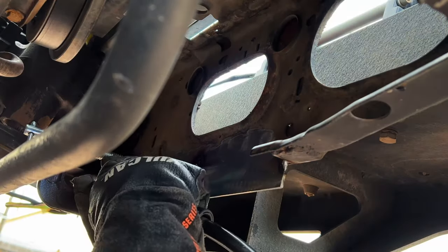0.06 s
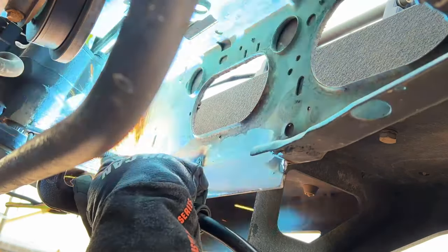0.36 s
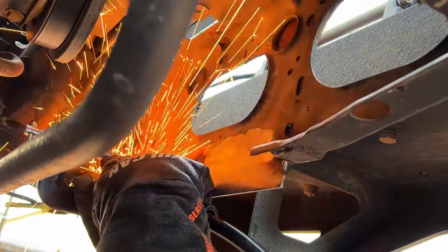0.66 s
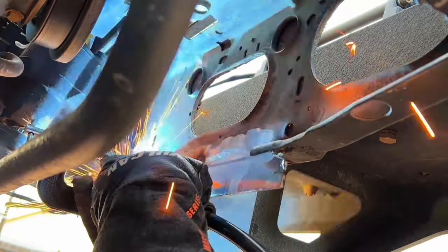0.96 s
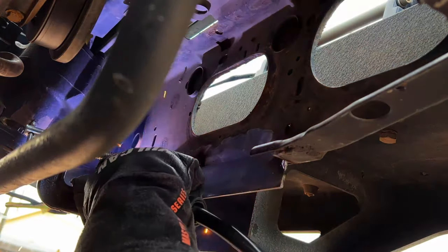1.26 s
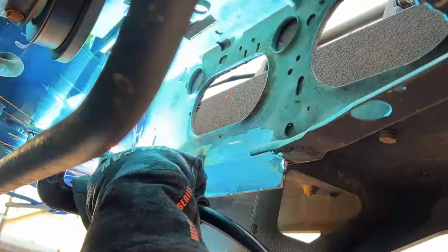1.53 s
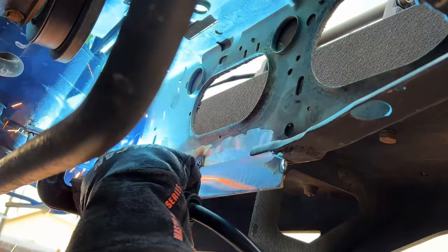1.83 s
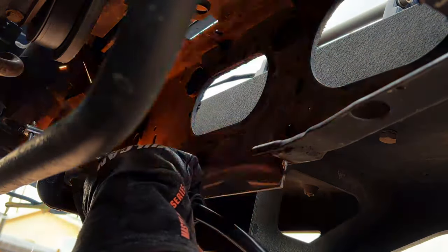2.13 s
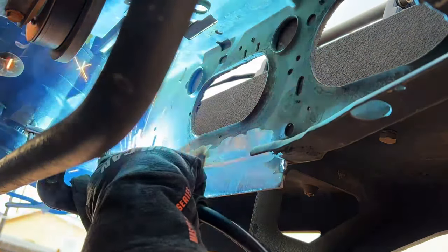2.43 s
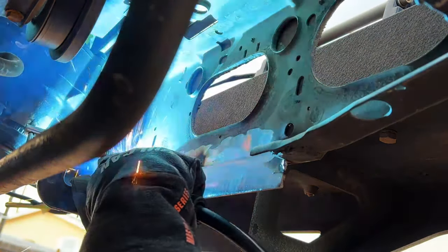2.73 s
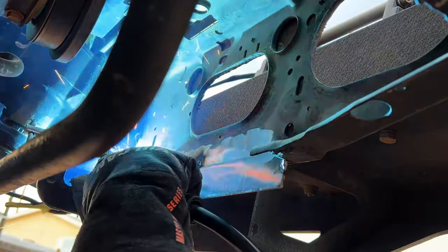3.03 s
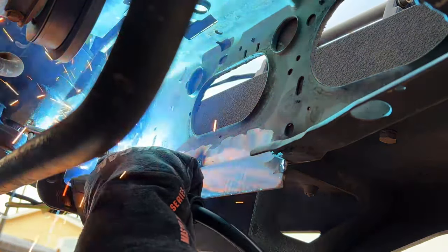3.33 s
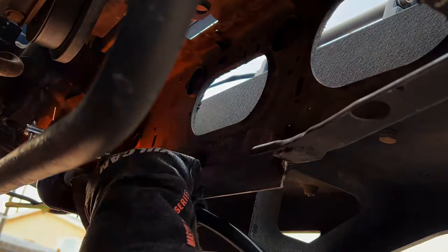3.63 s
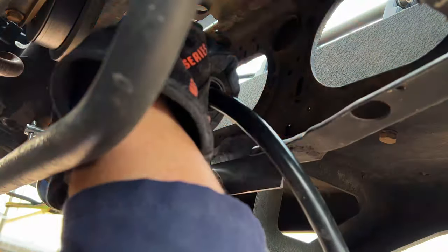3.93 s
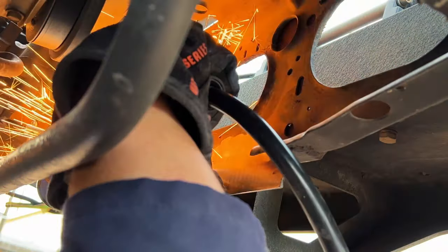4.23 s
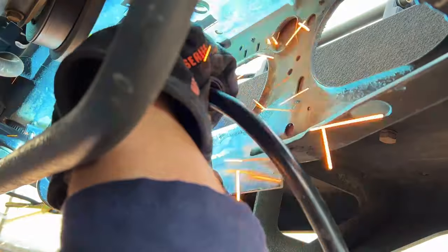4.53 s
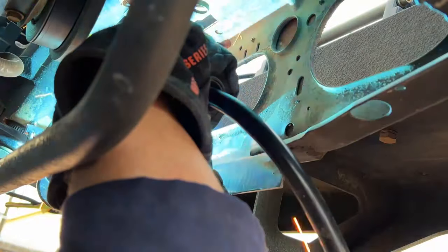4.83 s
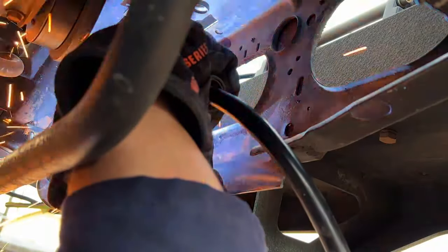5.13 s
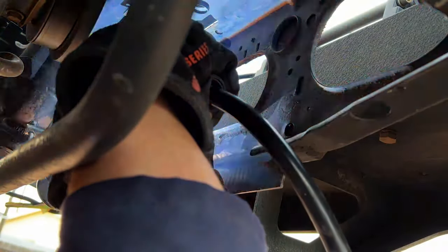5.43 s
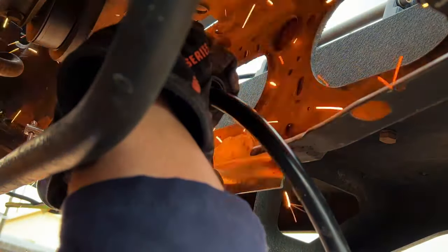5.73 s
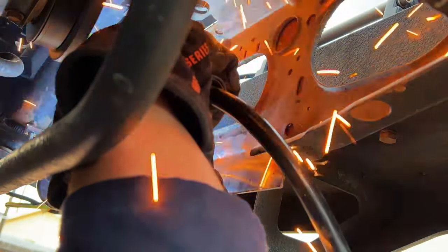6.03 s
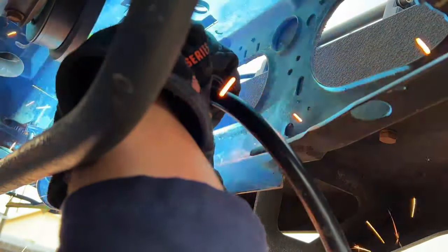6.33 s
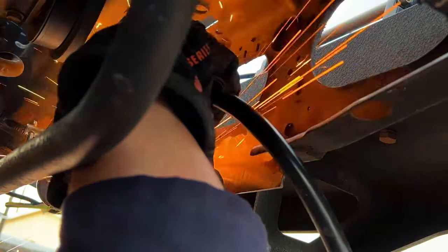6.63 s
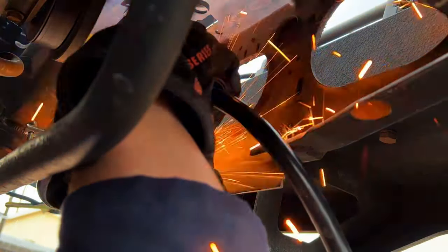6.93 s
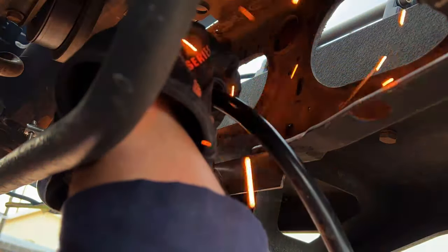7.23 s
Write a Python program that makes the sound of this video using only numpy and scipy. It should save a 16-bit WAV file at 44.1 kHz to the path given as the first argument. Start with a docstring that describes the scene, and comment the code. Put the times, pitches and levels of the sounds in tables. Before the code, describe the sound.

A wire-feed welder pops, crackles and sizzles close up in uneven bursts on steel, over faint gas hiss and fan hum.

```python
"""Wire-feed tack welding on the steel underside of a vehicle, heard close up, at two spots in turn.
The wire shorts on the pool and blows free with a sharp pop, singly or in a fast rattle, and the lit arc
sizzles. The hollow of the steelwork colours both, and longer stubs of wire go with a low puff.
Behind it, shielding gas surges and hisses, the welder's fan hums and a few faint squeaks pass.
A fast limiter flattens the pops."""
import sys
import numpy as np
from scipy import signal
from scipy.fft import rfft, irfft
from scipy.io import wavfile
from scipy.ndimage import uniform_filter1d, minimum_filter1d

SR = 44100
rng = np.random.default_rng(int(sys.argv[2]) if len(sys.argv) > 2 else 0)


def to_wav(s):
    """Save 16-bit WAV."""
    ch = np.atleast_2d(s).T  # columns
    pcm = np.round(np.clip(ch, -1, 1) * 32767)  # PCM
    wavfile.write(sys.argv[1], SR, pcm.astype(np.int16))


N = 325017

# Pops that stand out as the wire blows free: start_s, relative_level_db, low_shelf_db
WIRE_POPS = [(.319, -37.5, 19.5), (0.3427, -15, -7), (0.3524, -14, -4), (.3738, -15, -5.5),
             (0.4084, -15.5, -6), (0.4348, -16, -4), (0.546, -30.5, -9), (.5763, -17.5, -2.5),
             (.5916, -34, 6), (.609, -24, -6), (0.6138, -17, -20), (0.6222, -24.5, 12), (.6631, -33, -3),
             (.6708, -34, 14.5), (0.8065, -58, 24.5), (.9329, -23, -3), (0.9426, -18, -12),
             (.9867, -20, -0.5), (1.013, -28, -1), (1.0395, -17, -7), (1.3894, -20, -2),
             (1.4557, -17, -6.5), (1.5023, -23.5, -3), (1.5113, -15.5, -8), (1.5384, -20.5, -5.5),
             (1.554, -24, -7), (1.596, -20.5, -4), (1.688, -22, -10), (1.9751, -58.5, 24.5),
             (2.1571, -31, -2), (2.1616, -13.5, -9), (2.3368, -19.5, 1.5), (2.3569, -14, -6.5),
             (2.4023, -19, -5), (2.4408, -24.5, -2), (2.4852, -21.5, 0), (2.5326, -23.5, 1),
             (2.5723, -25.5, 0), (2.6816, -27.5, 4.5), (2.7143, -21, -5), (2.7418, -17.5, -12),
             (2.754, -19.5, -5), (2.773, -20, 2), (2.8117, -19, 0.5), (2.825, -13, -8), (2.8373, -20.5, 1),
             (2.906, -20, -1), (2.965, -20.5, 2), (3.0033, -25, 3.5), (3.0384, -21.5, -1),
             (3.0618, -17, -3.5), (3.078, -19, -7), (3.094, -19, -13), (3.115, -24, -5),
             (3.1318, -16.5, -12), (3.1489, -21.5, -3), (3.1875, -20.5, -5.5), (3.205, -19, -10),
             (3.2797, -19, -2.5), (3.317, -22.5, -3), (4.153, -39.5, 13.5), (4.1766, -17, -8),
             (4.194, -17.5, -4), (4.2064, -21.5, 0), (4.2576, -19.5, -14), (4.2822, -24, -18),
             (4.3034, -18, 2.5), (4.3463, -52, 21), (4.4101, -20.5, -7), (4.472, -10.5, -4),
             (4.539, -24, 6.5), (4.611, -28.5, 1.5), (4.627, -20, 2.5), (4.6635, -15, -4),
             (4.694, -13, 1.5), (4.7131, -11, -1.5), (4.7448, -18.5, 4), (4.8035, -16, -0.5),
             (4.949, -25, -16), (4.9676, -26, 13), (4.9797, -19.5, 1), (4.9988, -19, 6.5),
             (5.0124, -20, -3), (5.0323, -24.5, 13), (5.0403, -28, 11), (5.4523, -22.5, 9.5),
             (5.5117, -24.5, 6), (5.52, -18.5, 13), (5.5581, -18, 0), (5.5737, -13, -13),
             (5.611, -12.5, -7), (5.6368, -16.5, -3.5), (5.6591, -17.5, -1), (5.6985, -53.5, 24),
             (5.815, -33, 7), (5.8368, -20, -4), (5.888, -13, 1), (5.9478, -21, -6), (6.037, -56, 24),
             (6.128, -37.5, -6), (6.1366, -17, 1), (6.1943, -23.5, 2), (6.2229, -21, 0.5),
             (6.2593, -36.5, 19), (6.289, -16, -2.5), (6.321, -20.5, -1.5), (6.3437, -25.5, 6),
             (6.3795, -24, 8.5), (6.4067, -20.5, 3), (6.5187, -15, 0.5), (6.5536, -18, 2.5),
             (6.5751, -17.5, 0), (6.6034, -17, -4.5), (6.6561, -16.5, -1.5), (6.7254, -16.5, 0),
             (6.9219, -17.5, 3.5), (6.9297, -14, -1.5)]


def amp(db):
    """Decibels to gain."""
    return 10 ** (np.asarray(db) / 20)


def unit(x):
    """Scales to an rms of one."""
    return x / np.sqrt(np.mean(x ** 2) + 1e-20)


def eq_curve(points, hz):
    """Joins (freq_hz, level_db) points on a logarithmic frequency axis."""
    freq_hz, level_db = np.transpose(points)
    return np.interp(np.log(hz + 1), np.log(freq_hz + 1), level_db)


def drift(rate_hz):
    """Smooth random movement of rms one, up to about the given rate."""
    hz = np.fft.rfftfreq(N, 1 / SR)
    return unit(irfft(rfft(rng.standard_normal(N)) * np.exp(-(hz / rate_hz) ** 2), N))


def noise(colour):
    """Noise of rms one with the given EQ curve."""
    hz = np.fft.rfftfreq(N, 1 / SR)
    return unit(irfft(rfft(rng.standard_normal(N)) * amp(eq_curve(colour, hz)), N))


def lowpass(x, corner_hz):
    """Gentle one-pole low-pass."""
    pole = np.exp(-2 * np.pi * corner_hz / SR)
    return signal.lfilter([1 - pole], [1, -pole], x)


def envelope(start, end, rise_s, decay_s):
    """Rises from the start, holds until the end, then dies away."""
    t = np.arange(N) / SR
    return np.clip((t - start) / rise_s, 0, 1) * np.exp(-np.maximum(t - end, 0) / decay_s)


def shielding_gas(steelwork, flow_db=-58.5, ring_mix=1.7, nozzle_mix=0.44):
    """Gas surges, then settles to a steady hiss, ringing in the nozzle and off the steelwork."""
    # Tone of the gas jet: freq_hz, level_db
    jet_colour = [(300, -50), (1500, -6), (3800, -11), (5000, -8), (6200, -1.5), (7200, -1.5), (8700, -5.5),
                  (9700, -1.5), (11000, -14), (14000, -9), (16000, -20)]
    # Resonances of the nozzle: pitch_hz, half_width_hz, level_db
    nozzle_modes = [(5120, 78, 4), (6100, 200, -1), (6000, 90, -9), (6600, 35, -15), (6970, 170, 1),
                    (7850, 160, -6), (8670, 120, -23), (9470, 73, 0.5)]
    # Surges as the trigger opens the valve: start_s, rise_s, peak_db, decay_s
    surges = [(0, 0.074, -50, 0.73), (3.913, .005, -52.5, 0.18)]
    jet, hz = noise(jet_colour), np.fft.rfftfreq(N, 1 / SR)
    hiss = unit(jet + ring_mix * signal.fftconvolve(jet, steelwork)[:N])
    nozzle = sum(amp(db) / (1 + ((hz - centre) / width) ** 2) for centre, width, db in nozzle_modes)
    whistle = unit(irfft(rfft(rng.standard_normal(N)) * nozzle, N))
    surge = sum(amp(db) * envelope(s, s + rise_s, rise_s, decay_s) for s, rise_s, db, decay_s in surges)
    return np.hypot(amp(flow_db), surge) * unit(hiss + nozzle_mix * whistle) * amp(.5 * drift(25))


def welder_hum(room_db=-65.5, pitch_waver=0.0011, waver_db=2.3):
    """The fan and transformer hum, wavering slightly, over the room tone of the workshop."""
    # Fan and transformer tones: pitch_hz, level_db
    tones = [(61.5, -74), (333.8, -76.5), (629.8, -81), (775.2, -70.5), (882.9, -76), (1330, -81.5),
             (1550, -90)]
    # Room tone of the workshop: freq_hz, relative_level_db
    room_colour = [(12, -32), (20, -2), (70, -12), (153, -16), (335, -11), (474, -19), (752, -9.5),
                   (825, -12.5), (884, -11.5), (1170, -14.5), (1310, -10.5), (3880, -22), (5000, -27.5),
                   (6500, -44), (11000, -120)]
    phase_per_hz = 2 * np.pi * np.cumsum(1 + pitch_waver * drift(6.0)) / SR
    hum = sum(amp(db + waver_db * drift(6.2)) * np.sin(hz * phase_per_hz) for hz, db in tones)
    return np.sqrt(2) * hum + amp(room_db) * noise(room_colour)


def squeaks():
    """Faint, fuzzy whistles swell, glide and fade."""
    # Narrow bands of gliding noise: start_s, length_s, start_hz, end_hz, width_hz, level_db
    glides = [(0, 0.29, 1790, 1840, 150, -60), (.42, 0.19, 1810, 1800, 110, -64),
              (1.153, 0.045, 3050, 2900, 300, -62), (1.196, 0.048, 2760, 2700, 240, -54),
              (1.242, 0.058, 3130, 3260, 240, -55)]
    out = np.zeros(N)
    for s, length_s, start_hz, end_hz, width_hz, db in glides:
        size = int(length_s * SR)
        carrier = np.exp(2j * np.pi * np.cumsum(np.linspace(start_hz, end_hz, size)) / SR)
        white = rng.standard_normal(SR) + 1j * rng.standard_normal(SR)
        fuzz = lowpass(lowpass(white, width_hz / 2), width_hz / 2)[-size:]
        swell = signal.windows.tukey(size, .5)
        out[round(s * SR):][:size] += amp(db) * unit((carrier * fuzz).real) * swell
    return out


def pops(shorts, gain_db=22.5, spray_mix=0.35, spray_growth=0.34, spray_s=0.0014, shelf_hz=2000):
    """The bursting wire gives a pressure spike and a spray of droplets; harder pops spray more."""
    spikes, body = np.zeros((2, N))
    t = np.arange(SR // 100) / SR
    usual_db = np.median([db for _, db, _ in shorts])
    for s, db, shelf_db in shorts:
        pop = rng.standard_normal(len(t)) ** 3 * np.exp(-t / spray_s)  # cubed noise spits like droplets
        pop *= spray_mix * amp(spray_growth * (db - usual_db)) / np.linalg.norm(pop)
        pop[0] = 1  # the pressure spike
        at = round(s * SR) + np.arange(len(t))
        spikes[at] += amp(db) * pop
        body[at] += amp(db) * (amp(shelf_db) - 1) * pop
    return amp(gain_db) * (spikes + lowpass(body, shelf_hz))


def rattle_dips(jitter_s=0.001, shelf_db=0.5):
    """The wire dips into the pool at a steady pace between the main pops; gives rows like WIRE_POPS."""
    # Runs of quick dips: start_s, end_s, dips_per_s, relative_level_db
    rattles = [(.33, .45, 70, -21.5), (1.0, 1.06, 75, -24), (1.545, 1.61, 48, -25.5), (1.58, 1.70, 87, -26),
               (2.35, 2.42, 45, -21), (2.43, 2.50, 45, -27.5), (2.67, 2.82, 60, -24.5),
               (2.83, 3.045, 50, -23.5), (3.03, 3.14, 72, -22.5), (3.195, 3.33, 44, -24.5),
               (4.61, 4.68, 55, -20.5), (4.73, 4.82, 52, -17.5), (5.565, 5.62, 80, -22.5),
               (6.25, 6.30, 65, -25.5), (6.565, 6.62, 105, -20), (6.64, 6.74, 43, -20)]
    main_s, dips = np.array(WIRE_POPS)[:, 0], []
    for start, end, rate, db in rattles:
        accents = main_s[(main_s > start) & (main_s < end)]
        for a, b in zip(accents, accents[1:]):
            fill_s = np.linspace(a, b, round((b - a) * rate) + 1)[1:-1]
            dips += [(s + jitter_s * rng.standard_normal(), db, shelf_db) for s in fill_s]
    return dips


def sizzle(shorts, gain_db=-2.0, flutter_db=3.5, wander_db=1.5, duck_s=0.0015, duck_depth=0.85):
    """The lit arc fries in fine grains, and ducks while the wire is shorted just before each pop."""
    # Stretches in which the arc stays lit: start_s, end_s, relative_level_db, lows_over_highs_db
    burns = [(0.332, 0.42, -31.5, 1), (0.605, 0.629, -32, 21), (0.662, 0.735, -49.5, 4),
             (0.944, 0.957, -31, 10), (0.978, 1.062, -51, 20), (1.426, 1.455, -45, -12),
             (1.693, 1.753, -47, -22), (1.48, 1.677, -44.5, 7), (1.775, 1.889, -55, -3),
             (2.228, 2.29, -44, -18), (2.313, 2.684, -45, 0), (2.597, 2.63, -43, -11),
             (2.671, 3.356, -40, -8), (2.999, 3.15, -35.5, -6), (4.15, 4.21, -33.5, 0),
             (4.28, 4.293, -23, -1), (4.521, 4.54, -44, 8), (4.586, 4.79, -41.5, 5),
             (4.962, 5.042, -29.5, 19), (5.038, 5.152, -34.5, 10), (5.212, 5.392, -52.5, 4),
             (5.417, 5.458, -46, 8), (5.527, 5.62, -33.5, 13), (5.81, 6.005, -47.5, 2),
             (6.216, 6.445, -34.5, -17), (6.462, 6.61, -42, -9), (6.66, 6.92, -45.5, -24)]
    grains = unit(rng.standard_normal(N) * amp(flutter_db * drift(250) + wander_db * drift(30)))
    lows = signal.lfilter(*signal.butter(1, 7000, fs=SR), grains)
    t = np.arange(N) / SR
    pop_s = np.r_[np.sort(np.array(shorts)[:, 0]), np.inf]
    until_pop_s = pop_s[np.searchsorted(pop_s, t)] - t
    duck = 1 - duck_depth * np.exp(-(until_pop_s / duck_s) ** 2)
    out = np.zeros(N)
    for start, end, db, lows_db in burns:
        body = amp(lows_db)
        fry = (grains + (body - 1) * lows) / np.sqrt((1 + body ** 2) / 2)
        out += amp(db) * envelope(start, end, rise_s=0.0027, decay_s=0.01) * fry
    return amp(gain_db) * duck * out


def hollow(colour, modes, early_gain, early_s, t60_s, crack_mix=0.85, size=2048):
    """Impulse response of the steelwork: a crack off the nearest faces, then dense, short reflections."""
    hz, t = np.fft.rfftfreq(size, 1 / SR), np.arange(size) / SR
    peaks_db = sum(lift / (1 + (2 * (hz - centre) / width) ** 2) for centre, width, lift in modes)
    tone = amp(eq_curve(colour, hz) + peaks_db)
    decay = np.hypot(amp(-60 * t / t60_s), early_gain * np.exp(-t / early_s))
    log_gain = np.log(np.r_[tone, tone[-2:0:-1]])
    crack = np.fft.ifft(np.exp(signal.hilbert(log_gain).conj())).real  # minimum phase: a tight attack
    response = unit(rng.standard_normal(size) * decay) + crack_mix * unit(crack)
    # Tone and decay are imposed in turn, so the resonances stay as short as the reflections.
    for _ in range(8):
        spectrum = rfft(response) / tone
        spectrum /= np.sqrt(uniform_filter1d(abs(spectrum) ** 2, size=7))
        echoes = irfft(spectrum * tone) / decay
        response = decay * echoes / np.sqrt(uniform_filter1d(echoes ** 2, size=41) + 1e-20)
    return response / np.linalg.norm(response)


def reflections(x, response, steady_s=0.016, low_cut_hz=350, tails=7):
    """Early reflections stay put; late ones shift with the hand and torch, so the pops ring unalike."""
    hz, t = np.fft.rfftfreq(len(response), 1 / SR), np.arange(len(response)) / SR
    steady = np.exp(-(t / steady_s) ** 2)
    low_cut = hz ** 2 / (hz ** 2 + low_cut_hz ** 2)
    tail_tone = np.sqrt(uniform_filter1d(abs(rfft(response)) ** 2, size=61)) * low_cut
    tail_shape = np.sqrt(abs(uniform_filter1d(response ** 2, size=45)) * (1 - steady ** 2))
    out = signal.oaconvolve(x, response * steady)[:N]
    slot = np.arange(N) // (SR // 100) % tails  # round robin: the next tail every 10 ms
    for k in range(tails):
        tail = tail_shape * unit(irfft(tail_tone * np.exp(2j * np.pi * rng.random(len(hz)))))
        out += signal.oaconvolve(x * (slot == k), tail)[:N]
    return out


def workshop_reverb(x, wet_db=-29, t60_s=0.35, damping_hz=6000):
    """The room beyond the vehicle adds a faint, duller tail."""
    t = np.arange(SR // 2) / SR
    tail = lowpass(rng.standard_normal(len(t)), damping_hz) * amp(-60 * t / t60_s)
    return x + amp(wet_db) * signal.fftconvolve(x, tail / np.linalg.norm(tail))[:N]


def puffs():
    """A longer stub of wire blows away with a low push of hot gas that dies within a few cycles."""
    # Puffs of hot gas: start_s, level_db, pitch_hz
    thumps = [(0.344, -37.5, 131), (0.374, -48, 121), (0.411, -47, 110), (0.437, -47, 120),
              (0.623, -30, 236), (2.163, -48, 126), (2.825, -47, 110), (4.194, -31.5, 232),
              (4.471, -51, 131), (4.713, -41, 111), (4.998, -28, 235), (5.04, -39, 230), (5.517, -34, 220),
              (5.886, -45, 130), (6.929, -52, 149)]
    out, t = np.zeros(N), np.arange(SR // 10) / SR
    for s, db, hz in thumps:
        out[round(s * SR):][:len(t)] += amp(db) * np.sin(2 * np.pi * hz * t) * np.exp(-t * hz)
    return out


def scene(move_s=3.7):
    """The arc sounds through the hollow of whichever spot is being welded, over a bed of hiss and hum."""
    # Broad tone of the hollow around each spot: freq_hz, level_db
    first_colour = [(40, -28), (140, -26.5), (195, -12.5), (280, -10), (500, -25.5), (900, -19.5),
                    (2200, -25), (4000, -15.5), (6000, -28.5), (8500, -11), (10500, -12), (13500, -25),
                    (15700, -11.5)]
    second_colour = [(40, -44), (150, -43.5), (280, -26.5), (500, -29), (900, -23), (2200, -20),
                     (4000, -11), (6000, -14), (8500, -18.5), (10500, -18.5), (13500, -14.5), (15700, -8)]
    # Resonances of each hollow: pitch_hz, width_hz, boost_db
    first_modes = [(390, 47, 14), (678, 118, 18.7), (1044, 133, 11.2), (1360, 45, 18), (1599, 228, 18),
                   (1785, 123, 13.1), (2268, 256, 15.8), (2700, 130, 10), (2844, 160, 12.4),
                   (3260, 553, 13.5), (4330, 330, 13.7), (4760, 100, 13.8), (5450, 480, 5.9),
                   (5720, 1000, 17.4), (5960, 140, 13.4), (6517, 158, 18.7), (7170, 290, 9),
                   (7160, 290, 8.2), (7800, 147, 14.6), (8300, 160, 10), (8830, 580, 11.6), (9200, 16, 1.7),
                   (10840, 170, 9.8), (12420, 630, 14), (11740, 590, 3.5), (12900, 420, 2.2),
                   (14200, 1700, 5.1), (14370, 680, 10)]
    second_modes = [(274, 256, 18.3), (613, 94, 21.7), (976, 186, 16), (1284, 144, 19.7), (1502, 175, 19.1),
                    (1790, 400, 7.7), (1946, 35, 19), (2380, 89, 18), (2695, 132, 18.6), (3330, 416, 13.2),
                    (4176, 150, 11), (5010, 830, 8.6), (5690, 72, 17.6), (6224, 117, 21.1),
                    (6450, 114, 6.2), (6840, 112, 21.1), (7280, 157, 19), (7636, 256, 19), (8420, 660, 5.8),
                    (8470, 360, 13.9), (9176, 680, 15.9), (10200, 440, 5.5), (10130, 580, 9.3),
                    (11230, 310, 11), (12020, 470, 17), (13280, 490, 8.4), (13540, 820, 10.9),
                    (14100, 110, 1.3)]
    first_spot = hollow(first_colour, first_modes, early_gain=2.7, early_s=0.00026, t60_s=0.051)
    second_spot = hollow(second_colour, second_modes, early_gain=1.65, early_s=0.00051, t60_s=0.047)
    bed = shielding_gas(first_spot) + welder_hum() + squeaks()
    shorts = list(WIRE_POPS) + rattle_dips()
    arc = pops(shorts) + sizzle(shorts)
    moved = np.arange(N) / SR > move_s
    weld = reflections(arc * ~moved, first_spot) + reflections(arc * moved, second_spot)
    return (workshop_reverb(weld + puffs()) + bed)[None]


def record(dry, ceiling_db=-13, high_cut_hz=15900):
    """A fast look-ahead limiter flattens the pops, with a steep high cut before and after it."""
    high_cut = signal.firwin(401, high_cut_hz, window=("kaiser", 8), fs=SR)[None]
    filtered = signal.oaconvolve(dry, high_cut, "same")
    allowed_gain = np.minimum(1, amp(ceiling_db) / (abs(filtered[0]) + 1e-9))
    gain = uniform_filter1d(minimum_filter1d(allowed_gain, size=13), size=9)
    return signal.oaconvolve(filtered * gain, high_cut, "same")


dry = scene()
out = record(dry)
to_wav(out)
```